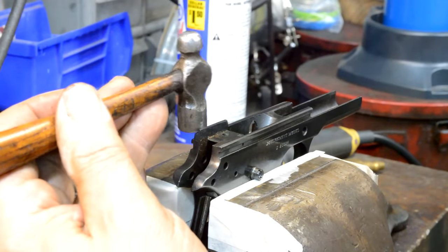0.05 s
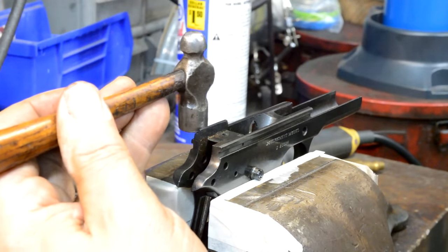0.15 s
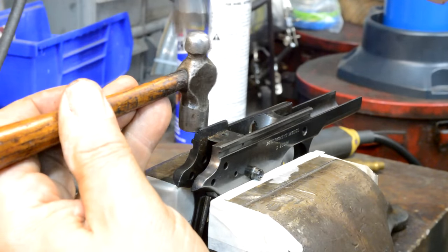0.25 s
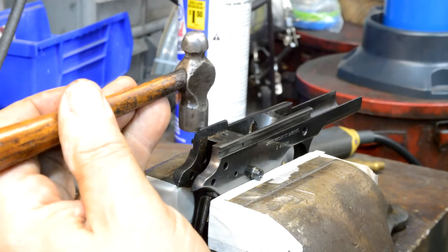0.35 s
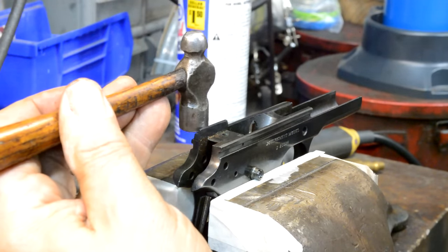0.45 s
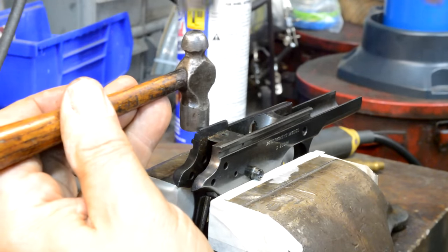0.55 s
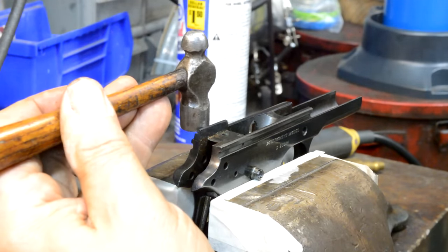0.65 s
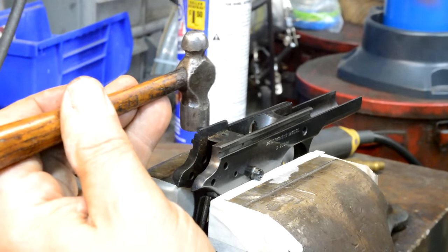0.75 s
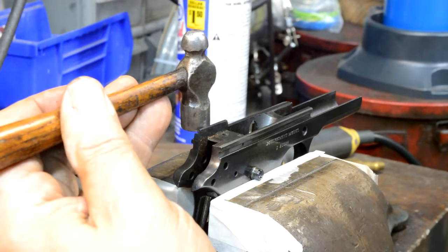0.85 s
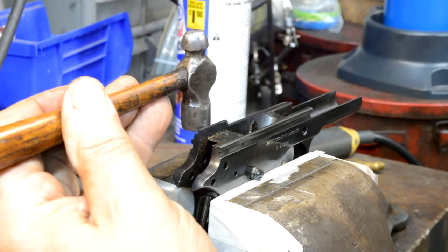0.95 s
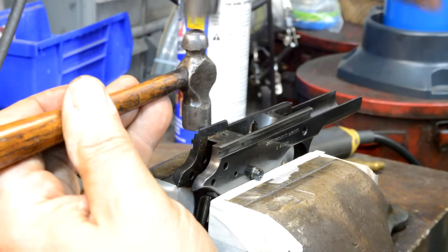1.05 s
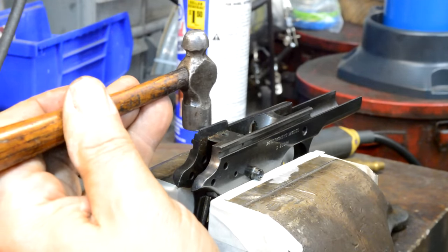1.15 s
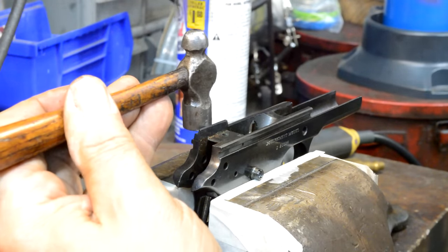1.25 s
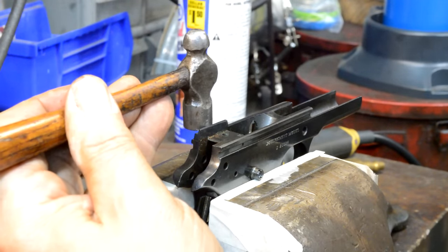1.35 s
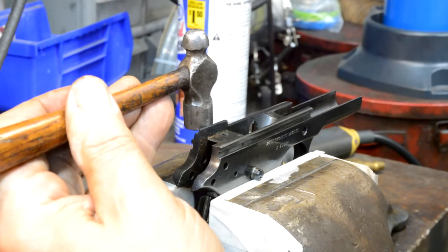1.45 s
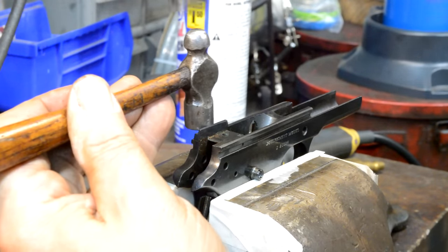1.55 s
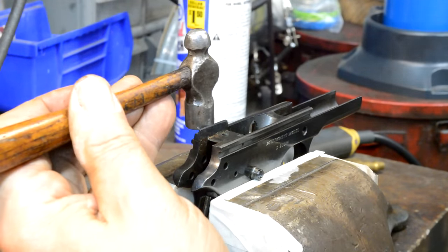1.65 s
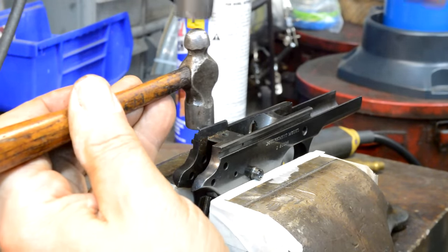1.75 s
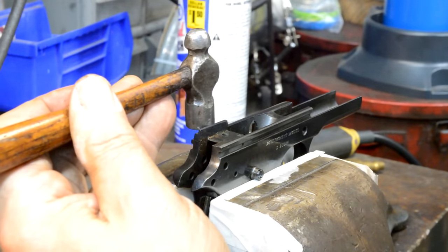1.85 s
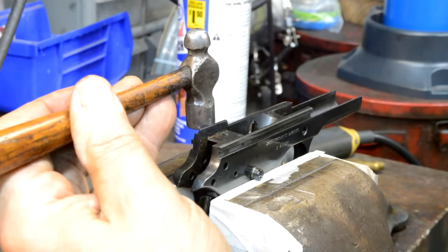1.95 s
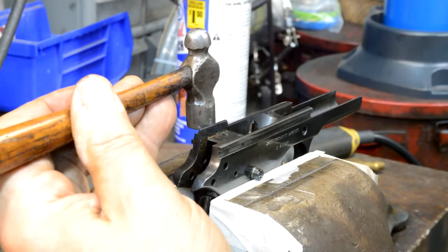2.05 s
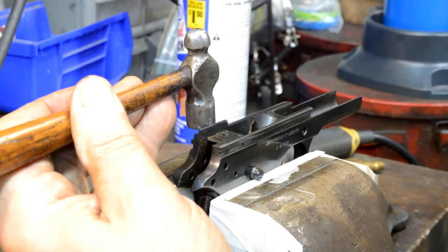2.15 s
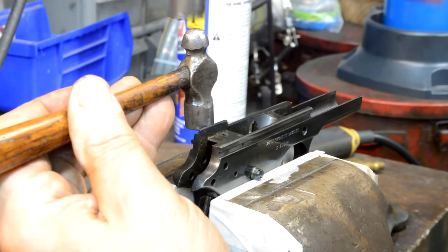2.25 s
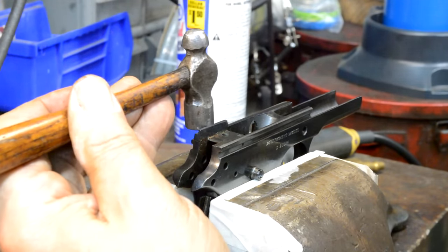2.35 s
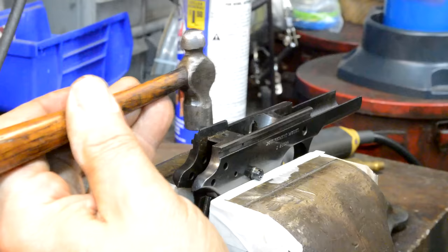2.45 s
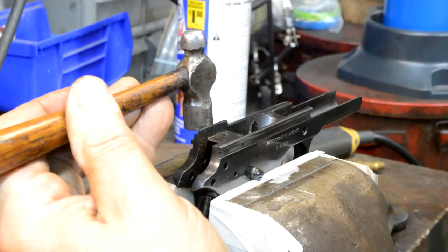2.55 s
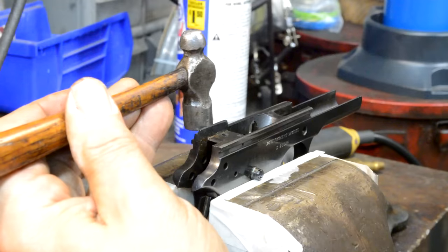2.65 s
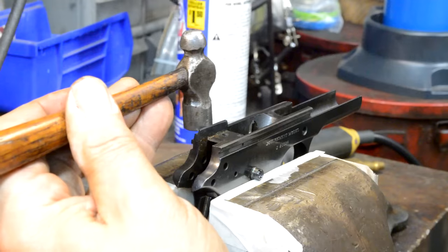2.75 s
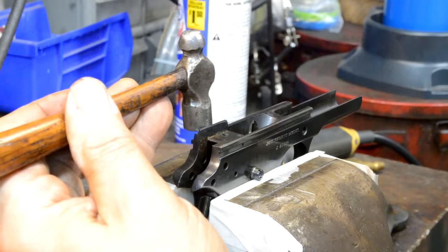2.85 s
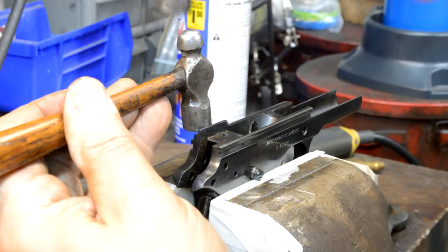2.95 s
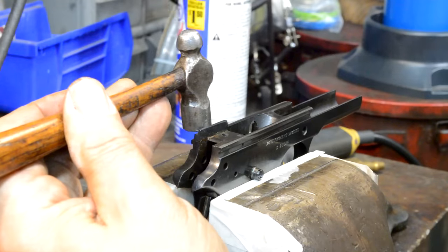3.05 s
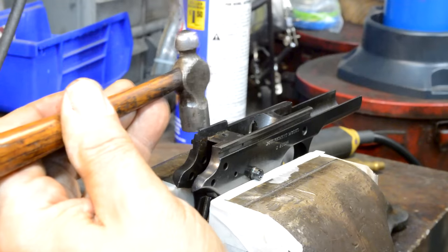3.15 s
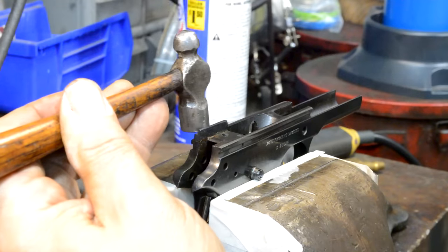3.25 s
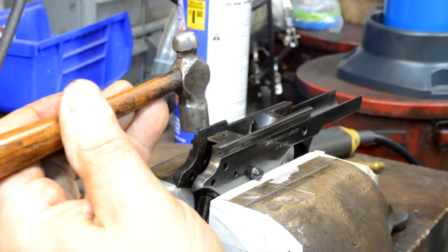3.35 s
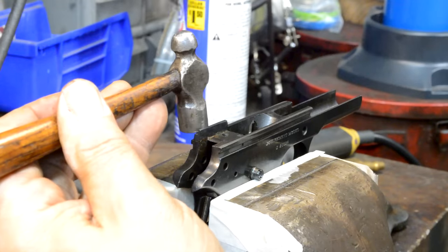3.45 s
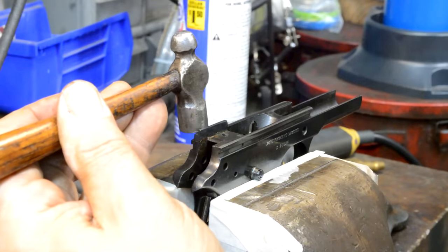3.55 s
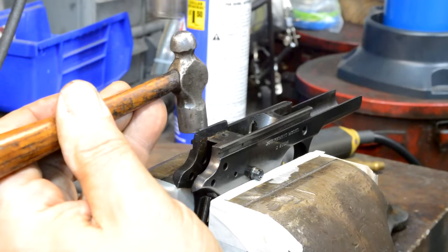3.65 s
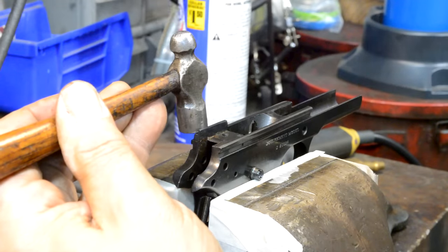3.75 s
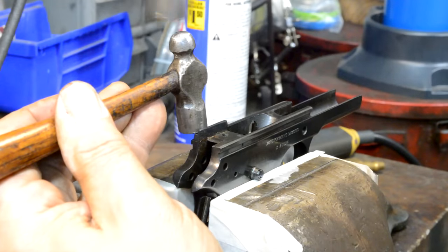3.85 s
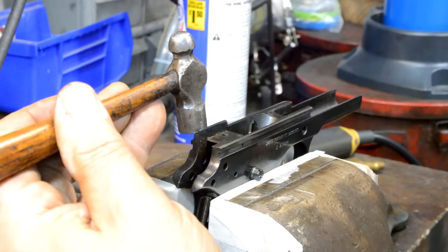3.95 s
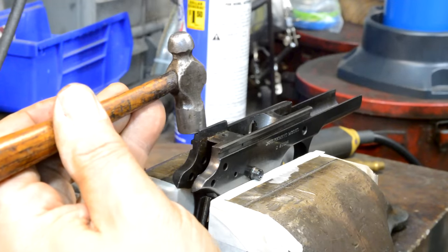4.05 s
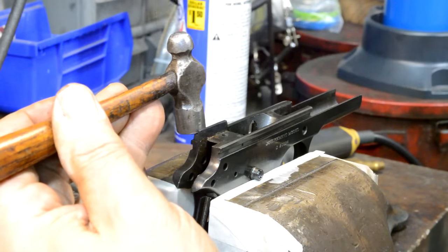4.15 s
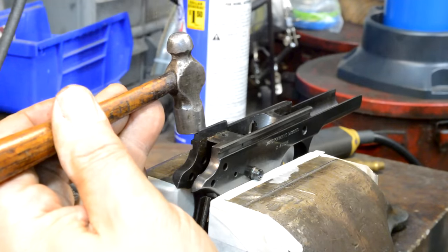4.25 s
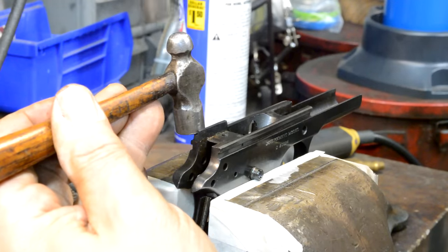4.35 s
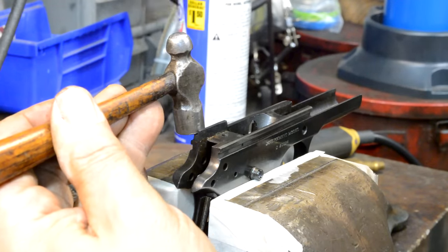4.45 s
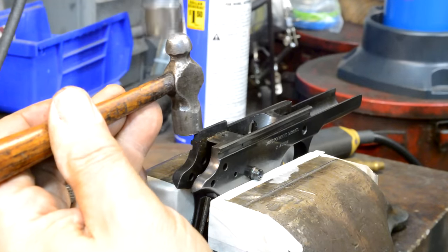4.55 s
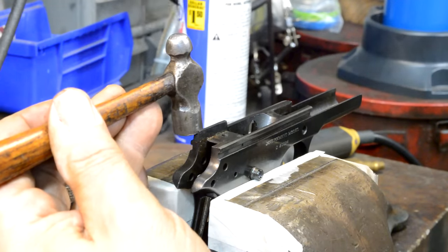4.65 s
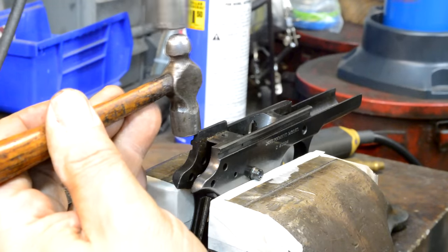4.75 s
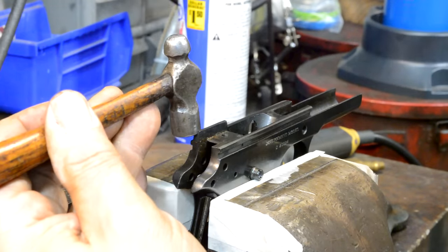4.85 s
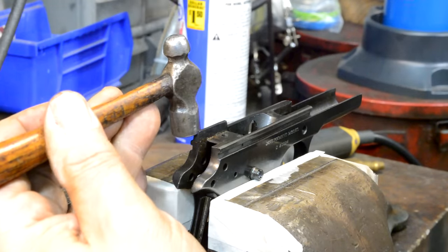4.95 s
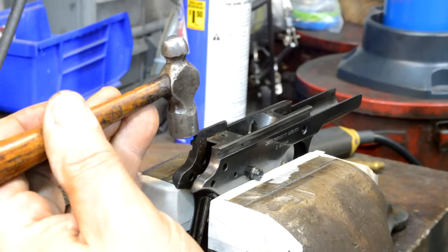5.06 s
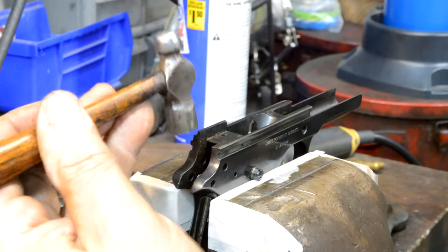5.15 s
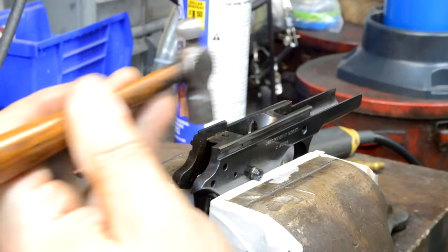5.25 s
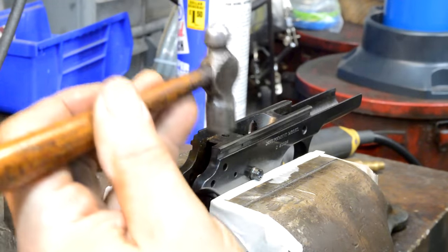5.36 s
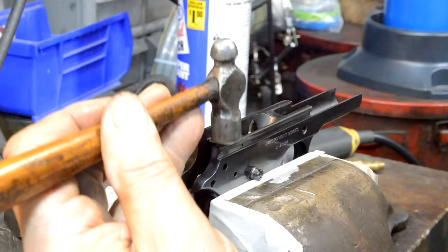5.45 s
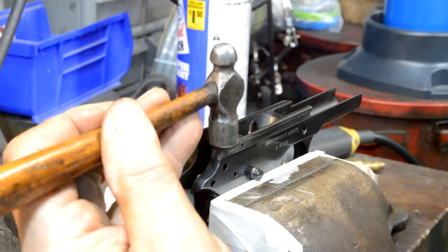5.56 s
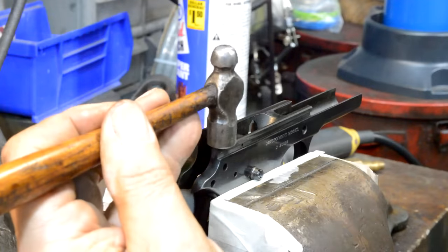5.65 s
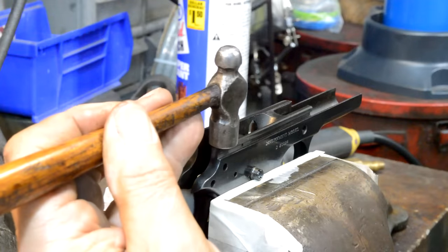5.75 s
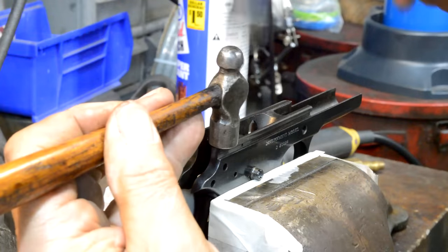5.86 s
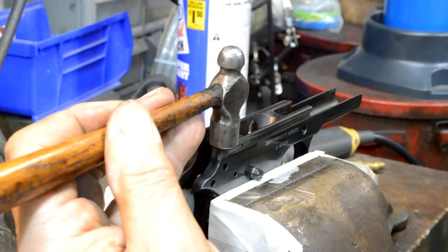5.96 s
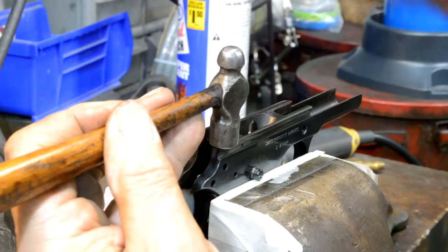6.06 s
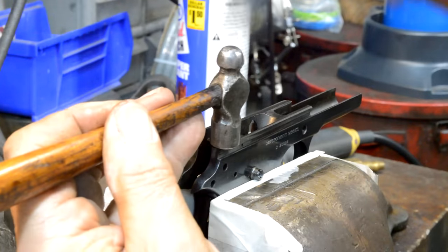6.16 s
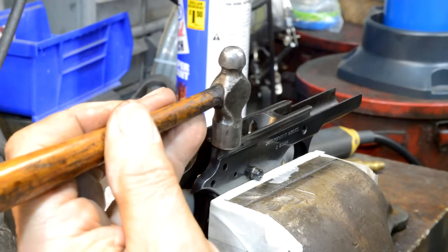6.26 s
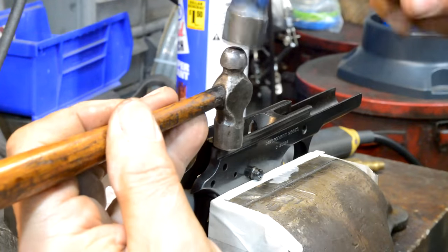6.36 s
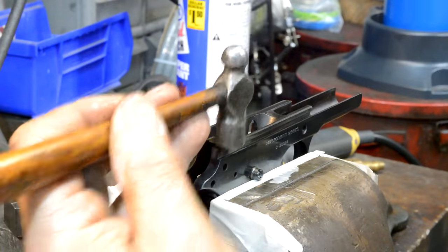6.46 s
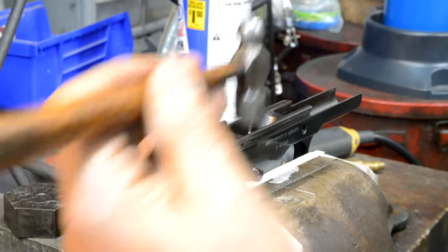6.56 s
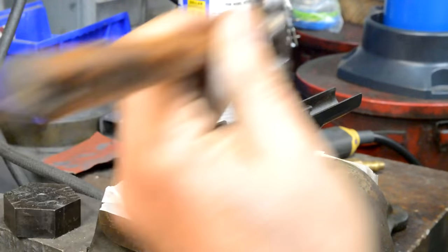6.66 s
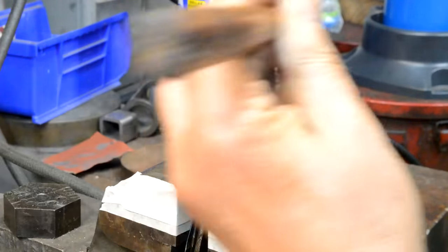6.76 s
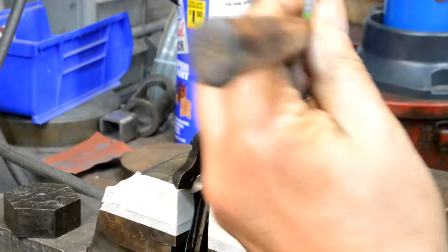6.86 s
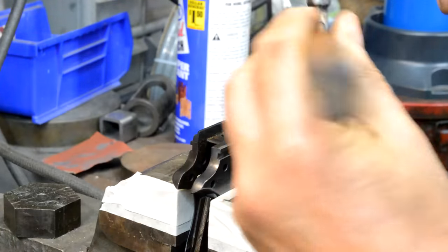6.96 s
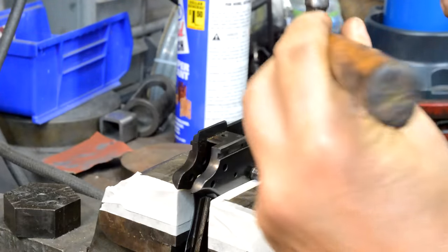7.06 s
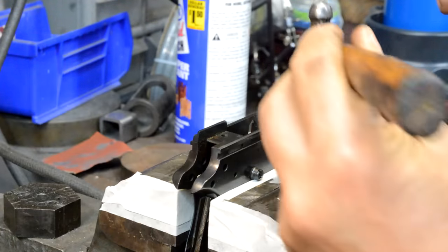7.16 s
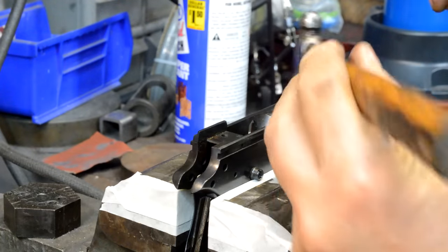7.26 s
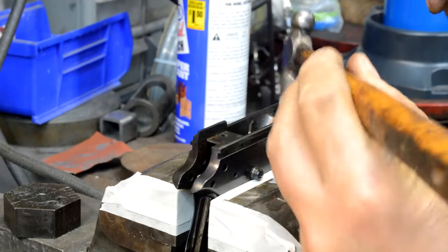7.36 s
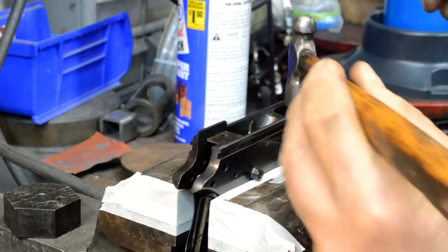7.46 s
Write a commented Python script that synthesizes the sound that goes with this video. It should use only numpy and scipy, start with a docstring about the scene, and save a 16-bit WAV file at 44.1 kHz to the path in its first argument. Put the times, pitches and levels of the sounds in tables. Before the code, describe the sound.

Rapid bright metallic taps, about four a second, ring sharply in a cluttered workshop, stop briefly, and finish with three hollower knocks.

```python
"""A small hammer taps a steel punch into a pistol frame in a bench vice, about four taps a second, then three more.
Each tap is a burst of dense noise for the crack plus decaying sines for bench, vice, frame, punch and clear ring.
A small workshop answers with an echo of decaying noise; light touches click faintly, mostly in the pauses.
Behind lie still air, a low rumble that the blows top up, a steady hum and one that sinks in pitch.
Late on, a hand rustles on the wooden handle. A fast limiter holds down the loud attacks."""
import sys
import numpy as np
from scipy import signal
from scipy.fft import rfft, irfft, next_fast_len
from scipy.io import wavfile
from scipy.ndimage import uniform_filter1d, minimum_filter1d

SR = 44100
rng = np.random.default_rng(int(sys.argv[2]) if len(sys.argv) > 2 else 0)


def digitize_waveform(pressure):
    """Quantize a signal to 16-bit integers and store it at the path in sys.argv[1].

    Rows of a 2-D input are taken as channels; values are limited to [-1, 1].
    """
    field = np.atleast_2d(pressure).T
    bounded = np.clip(field, -1, 1)
    quanta = np.round(bounded * 32767).astype(np.int16)
    wavfile.write(sys.argv[1], SR, quanta)


N = 331632
TIME = np.arange(N) / SR
AFTER = TIME[:SR]  # seconds since a blow

# hammer taps: t/s, blow level/dB, how firmly the punch's tip is seated (0-1)
HAMMER_TAPS = [(0.329, -17.5, 0.38), (0.5995, -3, 0.87), (0.8482, 1.5, 0.55), (1.0925, 2.5, 0.31),
               (1.3423, 2.5, 0.35), (1.5846, 3, 0.13), (1.8256, 3.5, 0.15), (2.0604, 4.5, 0.03),
               (2.3003, 4.5, 0), (2.5396, 3.5, 0.03), (2.7738, 3.5, 0.1), (3.0057, 4.5, 0),
               (3.241, 3.5, 0.33), (3.4737, 3, 0.59), (3.7011, 4, 0.38), (3.9252, 4, 0.39),
               (4.1512, 3.5, .62), (4.3765, 2.5, 0.87), (4.5973, 3, 0.94), (4.827, 2.5, .92),
               (5.0588, 3.5, 0.69), (5.9556, -7.5, 0.1), (6.1695, 2, .5), (6.4105, 4.5, 0.43)]
# how far the blows land off the punch's line, as a curve over time: t/s, slant (0-1)
BLOW_SLANT = [(.33, 0.7), (.6, 0.1), (5.1, 0.04), (5.95, 0.98), (6.17, 0.8), (6.41, .7)]


def amp(db):
    """Decibels to gain."""
    return 10 ** (np.asarray(db) / 20)


def unit(x):
    """Scale to rms 1."""
    return x / np.sqrt(np.mean(x ** 2))


def curve_at(s, curve):
    """Read a (t/s, value) curve at time s, with straight lines between its points."""
    times, values = np.transpose(curve)
    return np.interp(s, times, values)


def add(out, s, sound):
    """Mix a sound in at time s."""
    i = max(int(s * SR), 0)
    out[i:i + len(sound)] += sound[:N - i]


def fade(t60):
    """Free decay after a blow, down 60 dB in t60 seconds."""
    return np.exp(-np.log(1000) * AFTER / t60)


def colour(x, points):
    """Filter by an f/Hz, level/dB outline; minimum phase, so nothing sounds before the blow."""
    hz, db = np.transpose(points)
    size = next_fast_len(len(x) + 4096)
    size += size % 2
    bins = np.maximum(np.arange(size // 2 + 1) * SR / size, 1)
    outline_db = np.interp(np.log(bins), np.log(hz), db)
    # folding the cepstrum onto positive times gives the minimum phase
    cepstrum = irfft(np.log(amp(outline_db)))
    cepstrum[1:size // 2] *= 2
    cepstrum[size // 2 + 1:] = 0
    response = np.exp(rfft(cepstrum))
    return irfft(rfft(x, size) * response)[:len(x)]


def band(x, lo_hz, hi_hz):
    """Band-pass."""
    return signal.sosfilt(signal.butter(2, [lo_hz, hi_hz], "band", fs=SR, output="sos"), x)


def still_air(level_db=-63):
    """Still air of the shop: steady noise, weaker towards the treble."""
    # relative outline of the noise: f/Hz, level/dB per Hz
    air = [(40, -8), (110, -7), (200, -16.5), (400, -22.5), (800, -26.5), (1600, -34), (3500, -42),
           (8000, -51.5), (15000, -67.5)]
    return amp(level_db) * unit(colour(rng.standard_normal(N), air))


def rumble(start_db=-52.5, fall_db_per_s=0.8, shudder_t60_s=2):
    """A low rumble that slowly eases; every blow tops it up with a shudder of the bench."""
    power = amp(start_db - fall_db_per_s * TIME) ** 2
    for s, blow_db, _ in HAMMER_TAPS:
        # a slanted blow shakes the bench less
        shudder_db = -50 + blow_db - 8.5 * curve_at(s, BLOW_SLANT)
        add(power, s, (amp(shudder_db) * fade(shudder_t60_s)) ** 2)
    outline = [(10, -15), (28, -3), (52, 4.5), (80, -6.5), (115, -17.5), (170, -19.5), (400, -28), (1500, -68)]
    low = unit(colour(rng.standard_normal(N), outline))
    return low * np.sqrt(power)


def steady_hum():
    """Steady sine tones, each starting at a random point of its cycle."""
    # hum tones: f/Hz, rms level/dB
    tones = [(119, -71), (312, -77), (409, -85.5), (597, -85.5)]
    out = np.zeros(N)
    for hz, db in tones:
        out += amp(db) * np.sqrt(2) * np.sin(2 * np.pi * (hz * TIME + rng.random()))
    return out


def sinking_hum(from_hz=133, to_hz=107.2, glide_s=1.6, peak_s=2.1):
    """A faint wavering tone and its octave glide down, swell slightly and fade away."""
    hz = to_hz + (from_hz - to_hz) * np.exp(-(TIME / glide_s) ** 2)
    phase = 2 * np.pi * np.cumsum(hz) / SR
    since = TIME - peak_s
    rise_db_per_s, fade_db_per_s = 3, 9
    db = -58 + np.minimum(rise_db_per_s * since, -fade_db_per_s * since)
    # tone and octave waver apart, by 2.5 dB rms
    low_db, high_db = (2.5 * unit(band(rng.standard_normal(N), 1, 12)) for _ in range(2))
    octave_db = -3.5  # against the low tone
    return amp(db + low_db) * np.sin(phase) + amp(db + high_db + octave_db) * np.sin(2 * phase)


def touches():
    """Light touches and rebounds on the frame: short noise bursts around one broad resonance."""
    # touches of hammer and punch: t/s, level/dB before the decay, centre f/Hz, t60/s
    light_knocks = [(0.0187, -39.5, 1570, 0.025), (0.028, -41, 1490, 0.068), (.122, -63, 1450, 0.044),
                    (.33, -36, 1334, 0.065), (5.524, -65, 2993, 0.027), (5.686, -54.5, 2886, 0.045),
                    (6.184, -18.5, 3543, 0.02), (6.446, -21.5, 5260, 0.015), (6.803, -58, 898, .03),
                    (7.039, -70, 1700, .04), (7.142, -70, 3500, 0.021)]
    out = np.zeros(N)
    for s, db, hz, t60 in light_knocks:
        outline = [(hz / 4, -17), (hz / 1.5, -7), (hz, 0), (hz * 1.3, -7),
                   (hz * 2, -13), (hz * 6, -26), (hz * 12, -40)]
        burst = unit(colour(rng.standard_normal(SR), outline))
        add(out, s, amp(db) * burst * fade(t60))
    return out


def workshop(x, late_db=-49, early_db=-44, early_t60=0.077, gap_s=0.0064):
    """Quick reflections off the cluttered bench, then a diffuse tail with a decay time for each band."""
    # the workshop's echo by band: centre f/Hz, level/dB, t60 of the tail/s
    room = [(100.3, 2.5, 0.37), (510, 6.5, 0.31), (1060, 2.5, 0.29), (2520, 0, 0.4), (4000, -1, .43),
            (6200, 0.5, 0.4), (8450, -6.5, 0.35), (12500, -13, 0.21), (16000, -15, .27)]
    hz, db, t60 = np.transpose(room)
    spectrum = rfft(rng.standard_normal(SR))  # one bin per Hz
    echo = np.zeros(SR)
    for weights, band_db, band_t60 in zip(np.eye(len(hz)), db, t60):
        share = np.interp(np.arange(len(spectrum)), hz, weights)  # overlapping bands
        decay = amp(late_db) * fade(band_t60) + amp(early_db) * fade(early_t60)
        echo += amp(band_db) * irfft(spectrum * share, SR) * decay
    onset = 1 - np.exp(-(AFTER / gap_s) ** 2)  # the echo starts softly, after the direct sound
    return signal.fftconvolve(x, echo * onset)[:N]


def ring(part, detune, rise_s, scatter_db, pitch=1):
    """One part's modes as decaying sines; pitch and strength scatter a little at random from tap to tap."""
    # modes by part: f/Hz, level/dB, t60/s, before each tap's scatter
    # "knock" is the hollow note of blows off the punch's line, "shimmer" the overtones heard by way of the walls
    modes = { "bench": [(44.4, -46, 1), (57.4, -47.5, 0.94), (68, -45, .4), (94, -50.5, 0.74),
             (116.6, -47.5, 0.37), (190, -52, .15), (218.5, -52.5, 0.4), (278.3, -47.5, 0.17),
             (348, -51, 0.15), (387, -40.5, .08)], "vice": [(447.5, -40.5, 0.05), (538, -35, 0.11),
             (605, -53.5, 0.35), (681, -49.5, 0.26), (740, -47, 0.23), (783, -28, 0.044),
             (1310, -37.5, 0.085), (1516, -26.5, 0.034), (1646, -39.5, 0.093), (1703, -26.5, 0.03)],
             "knock": [(957, -37, 0.035), (1039.5, -35.5, 0.05)], "frame": [(2111, -17.5, 0.023),
             (2327, -19, 0.025), (2540, -20.5, 0.031), (2800, -27, 0.052), (3002, -26.5, 0.045),
             (3360, -25, .035), (3680, -25.5, .03), (4284, -16.5, 0.019), (6240, -25.5, 0.077),
             (6710, -27, 0.024), (7100, -25, 0.0078), (7605, -28, 0.013), (8300, -28.5, 0.024),
             (9456, -18.5, 0.031)], "punch": [(4667, -15.5, 0.031), (4810, -18.5, 0.04),
             (11170, -19, 0.03)], "ring": [(5248, -27, .1), (5605, -19, .14), (5607, -53, .5)],
             "shimmer": [(9462, -30, .05), (11162, -33, .04), (14500, -41, .04)], }
    hz, db, t60 = np.transpose(modes[part])[:, :, None]
    shift, strength = rng.standard_normal((2, len(hz), 1))
    sign = (-1) ** np.arange(len(hz))[:, None]
    t = AFTER[:int(2 * t60.max() * SR)]
    mode_hz = hz * pitch * (1 + detune * shift)
    waves = sign * amp(db + scatter_db * strength) * np.sin(2 * np.pi * mode_hz * t)
    decay = np.exp(-np.log(1000) * t / t60)
    return np.sum(waves * decay, axis=0) * (1 - np.exp(-t / rise_s))


def taps(crack_db=-13, crack_t60=0.02, fresh=0.82, trade=0.15):
    """Returns the bare blows and the steel they set ringing: each part's modes and a crack of dense noise."""
    # the hard contact's colour: f/Hz, level/dB per Hz
    crack = [(100, -23), (1100, -8.5), (2200, 3.5), (4500, 11), (7300, 7.5), (8700, 0), (10700, 8),
             (12200, -3), (15500, -8)]
    # how freely the fingers let the steel ring, as a curve over time: t/s, level/dB
    freedom = [(.33, -25.5), (.6, -3), (1.5, -5.5), (2.2, -10.5), (2.6, -8), (3.3, 0.5), (4.1, 0),
               (4.55, 3.5), (5.1, 0.5), (6.41, -6)]
    # a firmly seated punch passes more of the blow on, by part: level when loose/dB, gain when firm/dB
    seated = {"vice": (-0.48, 3.8), "knock": (-6.5, 9.5), "punch": (-10, 17.9)}
    blows, steel = np.zeros((2, N))
    same = rng.standard_normal(SR)  # the grain that all cracks share
    for s, blow_db, seating in HAMMER_TAPS:
        ring_db = curve_at(s, freedom)
        slant = curve_at(s, BLOW_SLANT)
        vice_db, knock_db, punch_db = (seated[part][0] + seated[part][1] * seating
                                       for part in ("vice", "knock", "punch"))
        vice_db += 2 * slant
        knock_db += 15.5 * slant
        bench_db = 1 + 0.5 * ring_db  # a light grip also lets the bench shake more
        treble_db = -0.66 + 0.45 * blow_db + 4 * slant  # harder blows are brighter
        # the punch's note drops when it is loose or struck at a slant
        pitch = 1 - 0.025 * (1 - seating) - 0.044 * slant
        tone = [(200, bench_db), (650, vice_db), (1100, knock_db / 2), (2200, 0.00028),
                (3800, 0.00074), (4700, punch_db / 2), (9000, treble_db)]
        grain = unit(same + fresh * rng.standard_normal(SR)) * fade(crack_t60)
        # what goes into the hollow knock is lost to the frame's clank
        frame_db = -trade * max(knock_db, 0)

        add(blows, s, amp(blow_db) * colour(signal.unit_impulse(SR), tone))
        add(blows, s, amp(blow_db + treble_db) * ring("shimmer", detune=0.002, rise_s=0.001, scatter_db=2))
        add(steel, s, amp(blow_db + crack_db) * colour(colour(grain, crack), tone))
        add(steel, s, amp(blow_db + bench_db) * ring("bench", detune=0.025, rise_s=0.0016, scatter_db=2.5))
        add(steel, s, amp(blow_db + vice_db) * ring("vice", detune=0.012, rise_s=0.00043, scatter_db=1))
        add(steel, s, amp(blow_db + knock_db) * ring("knock", detune=0.019, rise_s=0.001, scatter_db=2))
        add(steel, s, amp(blow_db + frame_db) * ring("frame", detune=0.0055, rise_s=0.00022, scatter_db=0.7))
        punch = ring("punch", detune=0.0059, rise_s=0.00058, scatter_db=0.5, pitch=pitch)
        add(steel, s, amp(blow_db + punch_db) * punch)
        add(steel, s, amp(blow_db + ring_db) * ring("ring", detune=0.0003, rise_s=0.001, scatter_db=0.5))
    return blows, steel


def rustle(middle_s=7.06, width_s=0.12, level_db=-73.5):
    """The hand shifts its grip once: skin rubs unevenly on the wooden handle, swelling and dying away."""
    outline = [(150, -12), (500, -3), (1000, -4), (1900, 0), (2400, -13), (7000, -22), (15000, -36)]
    rub = unit(colour(rng.standard_normal(N), outline))
    catches_db = 4 * unit(band(rng.standard_normal(N), 12, 60))
    swell = np.exp(-((TIME - middle_s) / width_s) ** 2 / 2)
    return rub * amp(level_db + catches_db) * swell


def scene(thud_db=4, spread_db=14, ring_spread_db=-9):
    """The direct sound of the work at the vice, its echo off the walls and the shop's background."""
    background = still_air() + rumble() + steady_hum() + sinking_hum()
    knocks = touches()
    blows, steel = taps()
    thud = amp(thud_db) * band(blows, 120, 1000)
    # the walls gather sound from all sides of the steel, so their echo is an even wash with little of its ring
    echo = workshop(amp(spread_db) * blows + amp(ring_spread_db) * steel + knocks)
    return (steel + thud + knocks + echo + rustle() + background)[None]


def record(dry, ceiling=0.6, top_hz=15700):
    """A fast limiter holds down attacks above its ceiling; a steep low-pass then cuts the top."""
    wanted = ceiling / np.maximum(np.abs(dry), ceiling)
    # the gain moves within 15 samples, dropping just ahead of each peak
    gain = uniform_filter1d(minimum_filter1d(wanted, size=15), size=15)
    low_pass = signal.ellip(10, 0.1, 100, top_hz, fs=SR, output="sos")
    return signal.sosfilt(low_pass, dry * gain)


dry = scene()
out = record(dry)
digitize_waveform(out)
```